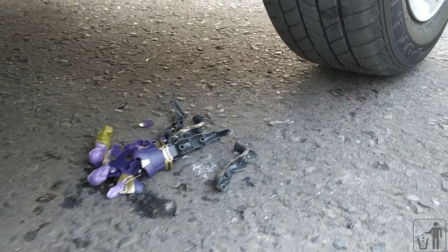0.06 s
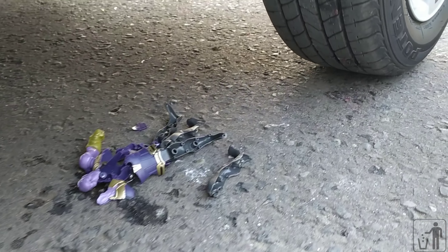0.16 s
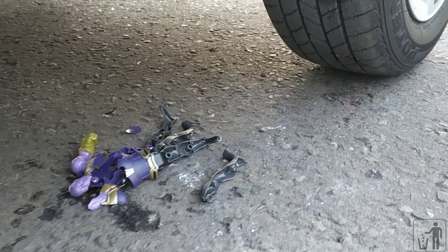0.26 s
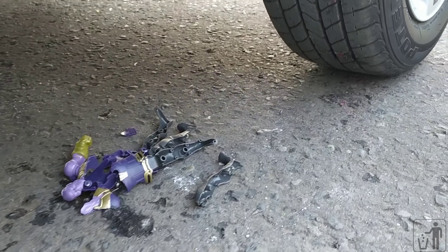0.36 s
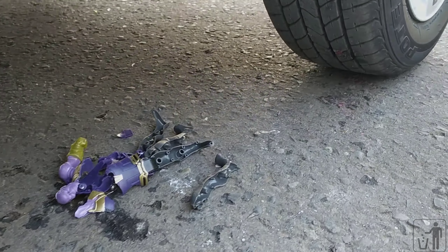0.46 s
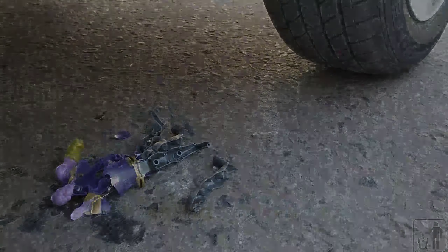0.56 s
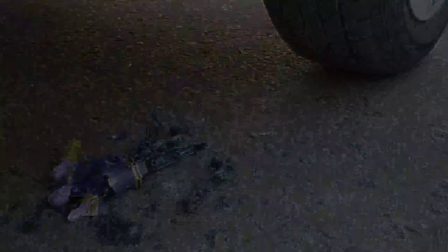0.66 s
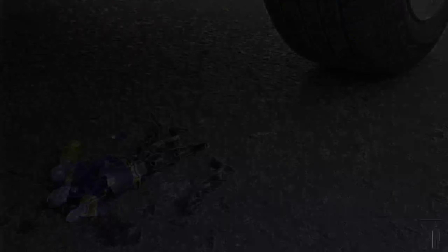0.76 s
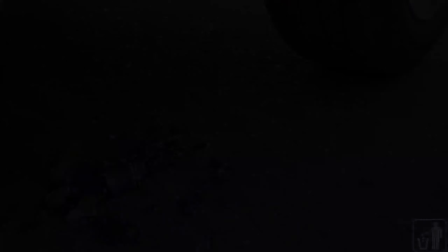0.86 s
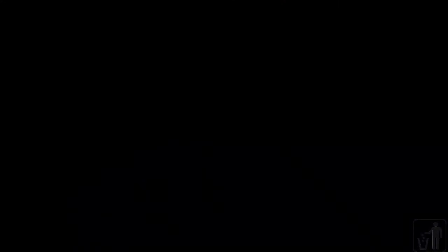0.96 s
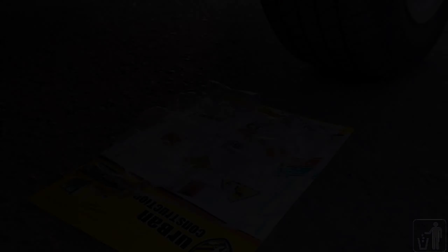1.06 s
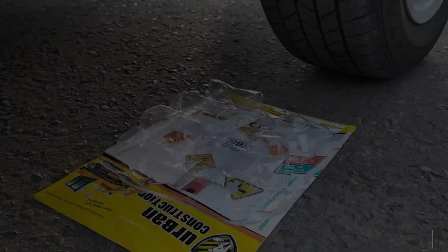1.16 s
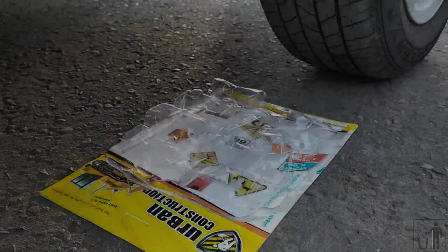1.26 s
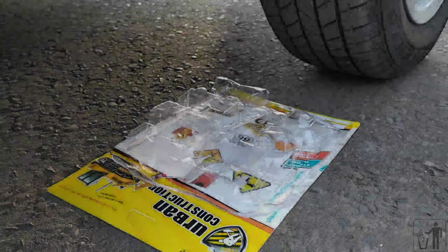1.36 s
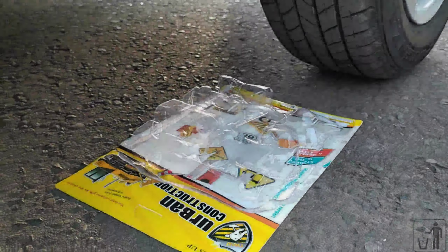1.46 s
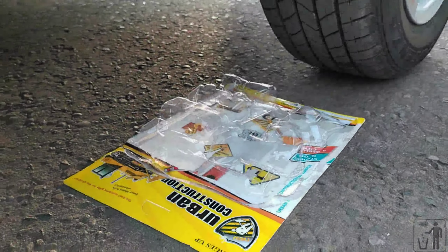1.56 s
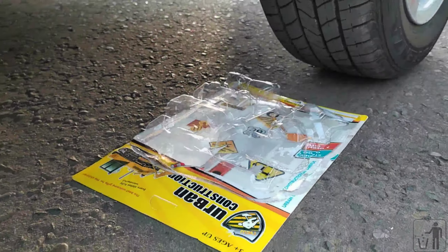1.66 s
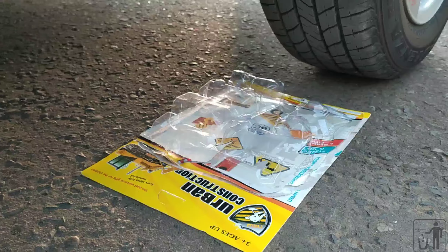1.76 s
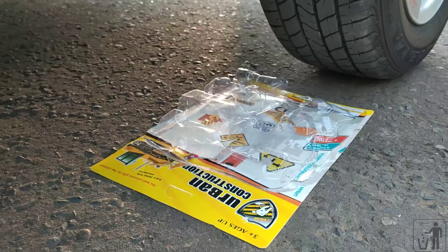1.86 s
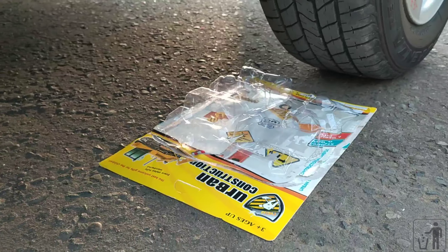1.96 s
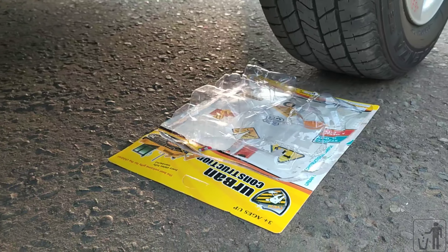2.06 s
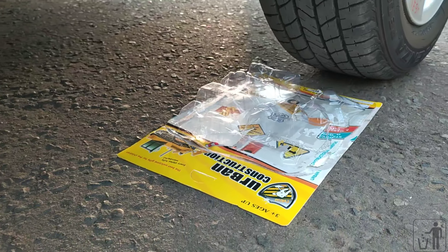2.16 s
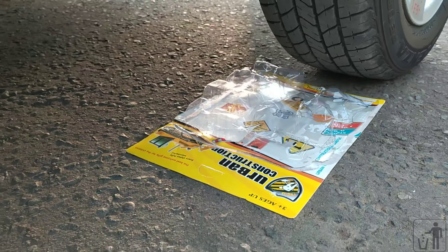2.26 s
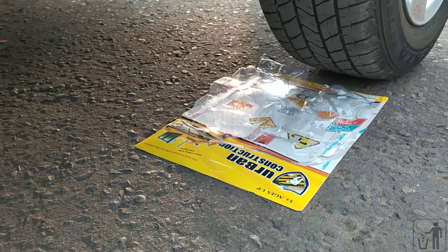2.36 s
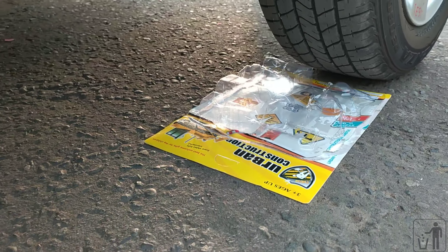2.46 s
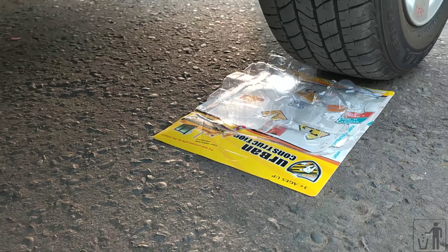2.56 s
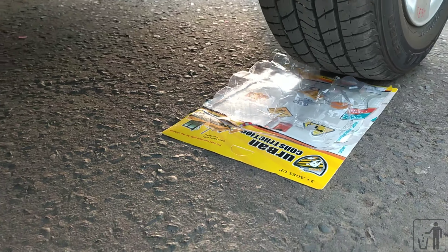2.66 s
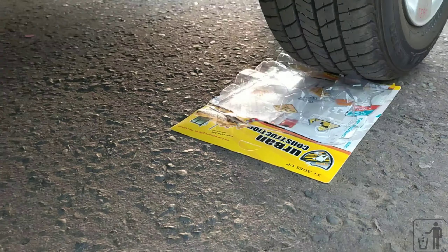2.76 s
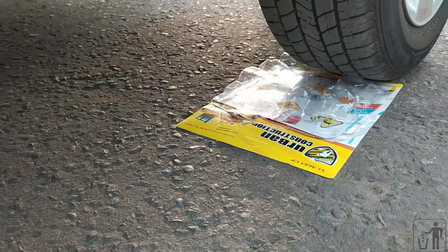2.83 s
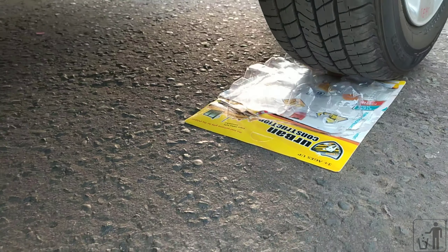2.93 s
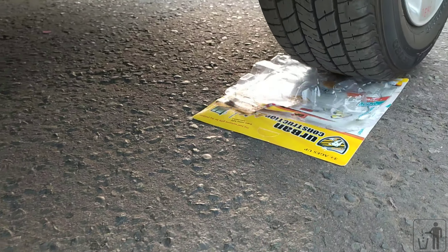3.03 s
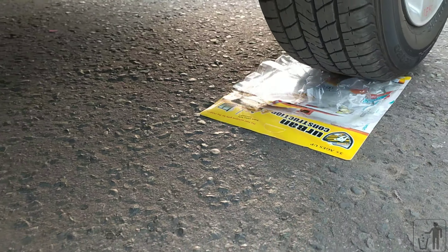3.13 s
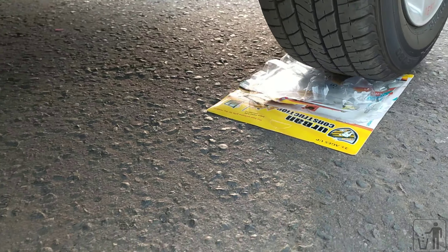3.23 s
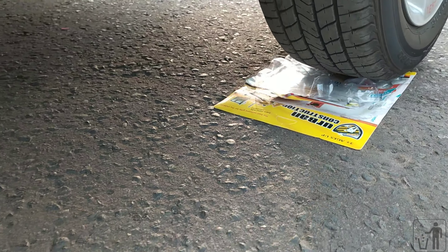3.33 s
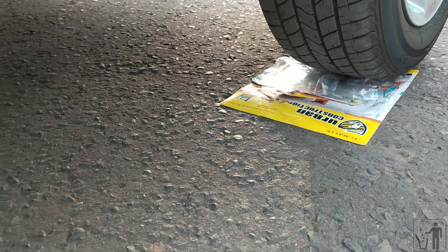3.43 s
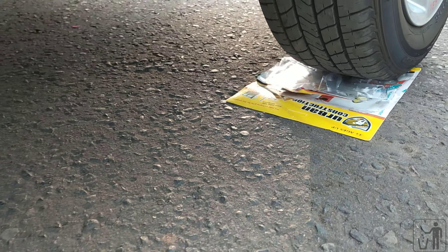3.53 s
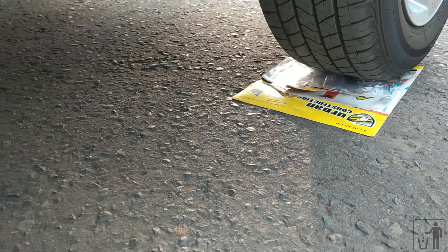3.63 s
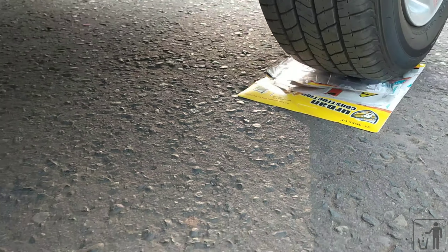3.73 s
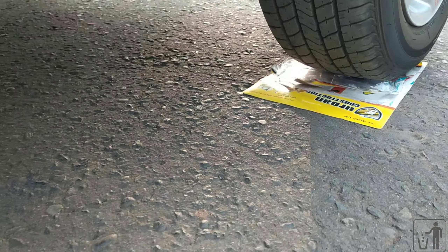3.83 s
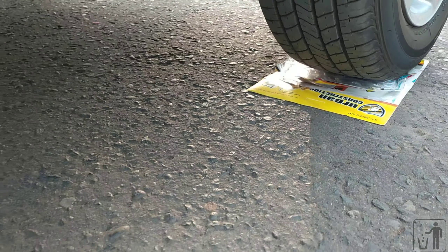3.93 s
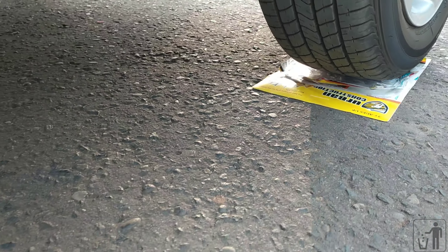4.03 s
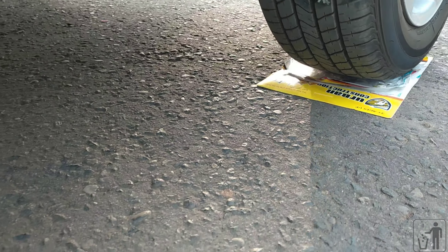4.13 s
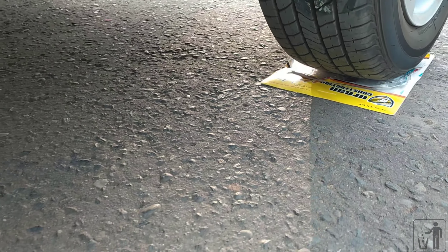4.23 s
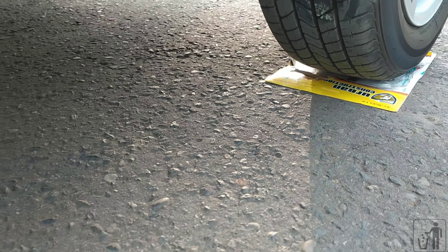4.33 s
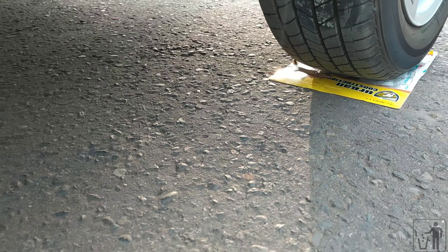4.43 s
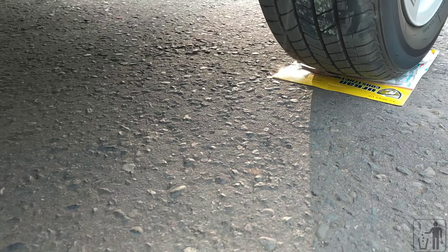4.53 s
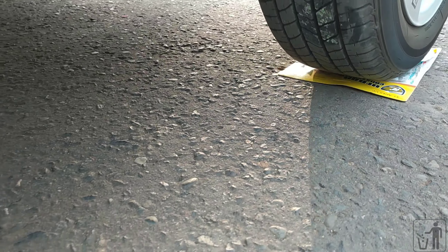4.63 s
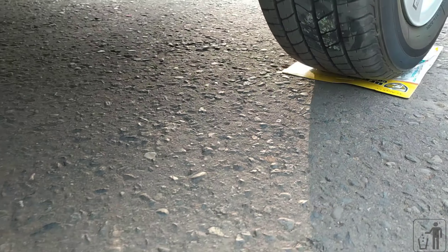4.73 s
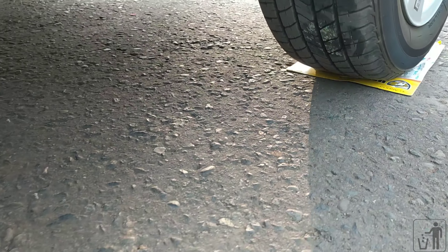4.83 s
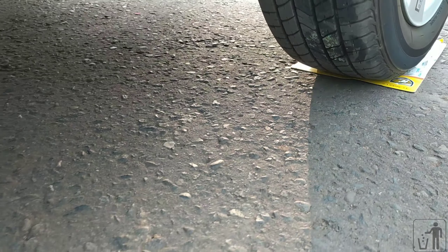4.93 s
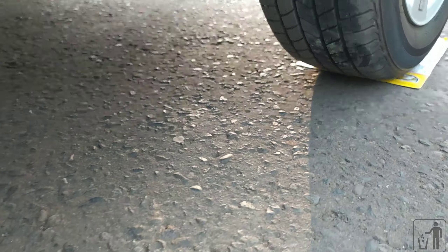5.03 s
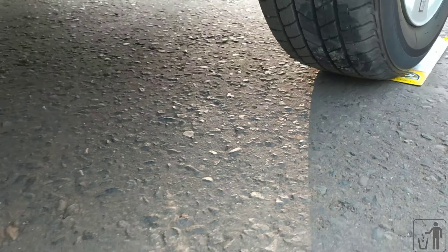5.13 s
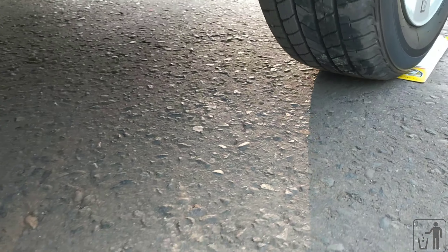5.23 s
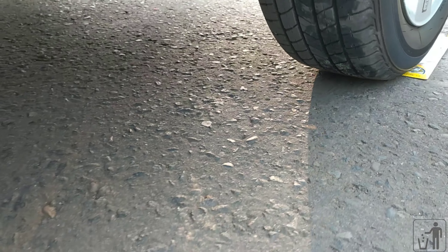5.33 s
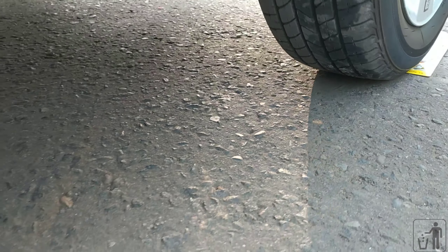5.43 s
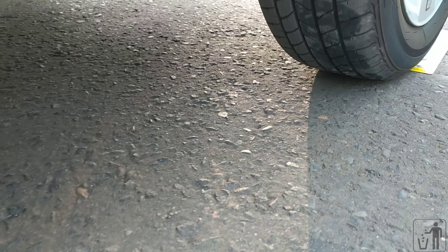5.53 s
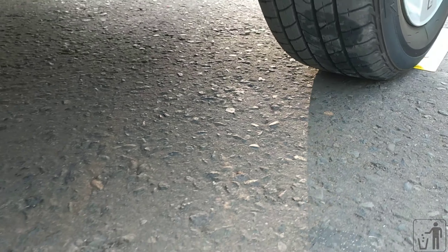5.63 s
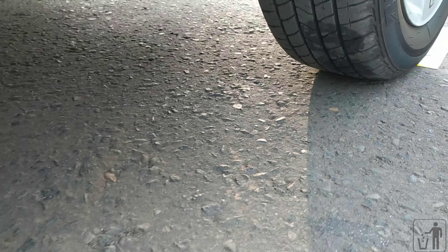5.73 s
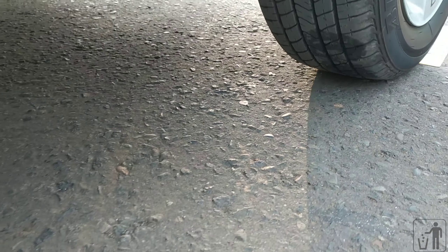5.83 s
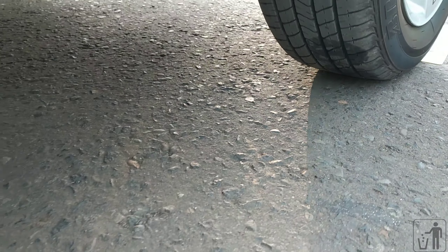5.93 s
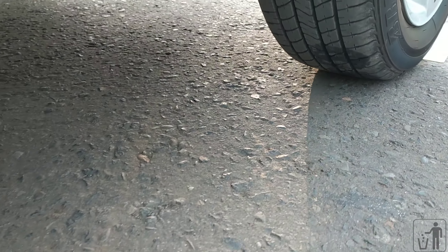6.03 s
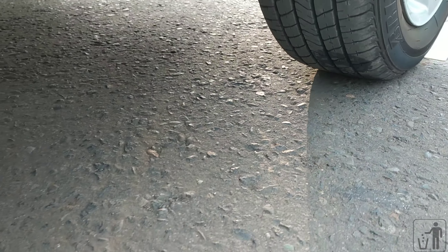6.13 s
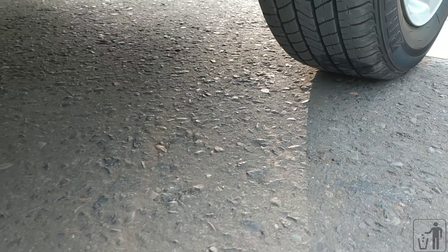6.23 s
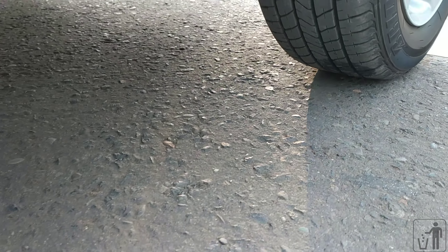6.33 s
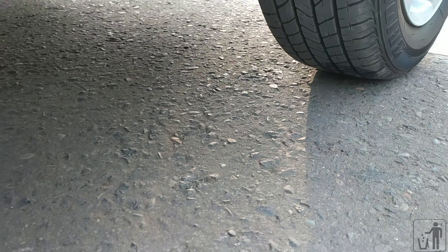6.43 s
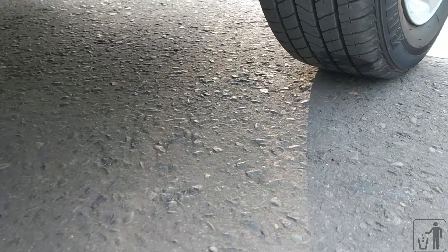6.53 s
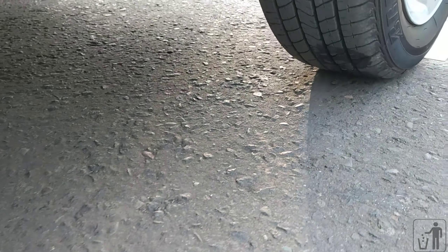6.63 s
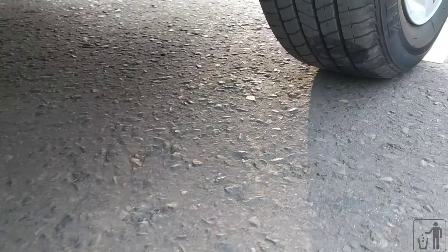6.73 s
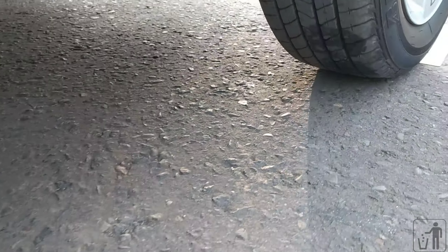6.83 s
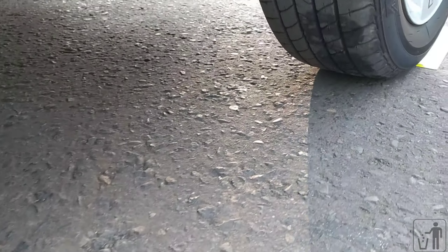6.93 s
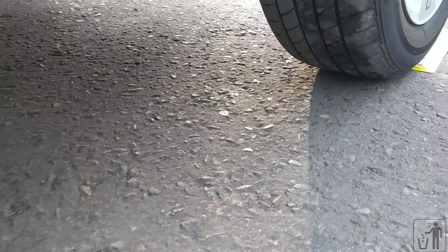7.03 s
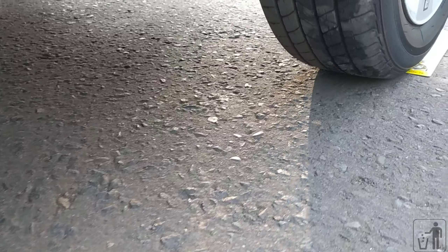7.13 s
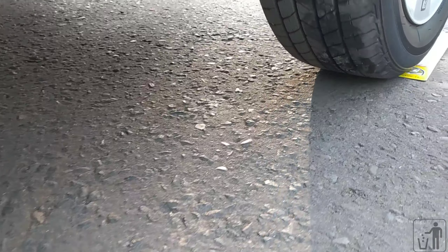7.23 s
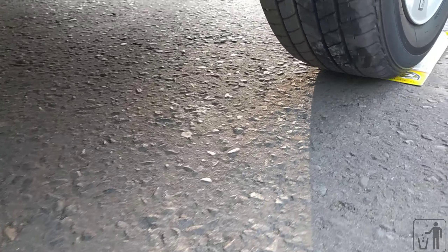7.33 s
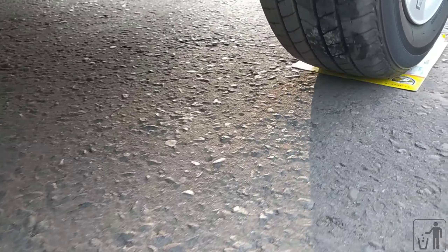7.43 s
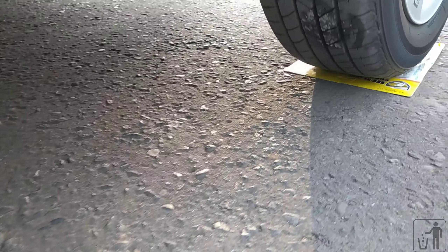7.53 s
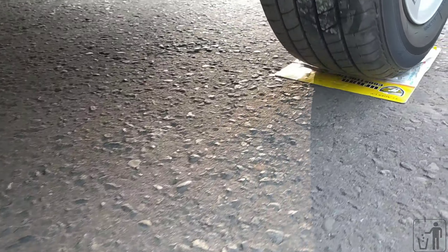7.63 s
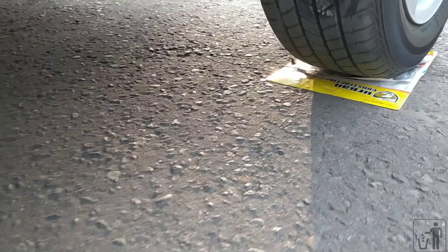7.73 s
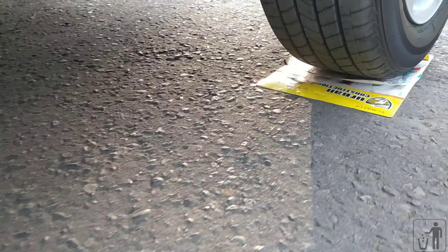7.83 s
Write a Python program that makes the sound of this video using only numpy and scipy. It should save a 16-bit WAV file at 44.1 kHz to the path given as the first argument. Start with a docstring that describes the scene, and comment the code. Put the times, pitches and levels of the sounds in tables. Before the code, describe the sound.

Low idling engine throb, brief wind puffs and plastic clacks, then dense sharp cracking of blister packaging under a slow tyre, thinning out and resuming.

```python
"""On asphalt, a car creeps at idle over a plastic toy pack, rolls off it and comes back.
The stiff blister buckles in sharp snaps and fine crinkles: short filtered noise bursts with a damped ring.
Dense reflections between road and underbody answer them, strongly where the tyre covers the pack.
Shaped noise and sines at firing orders make the car; low noise makes the wind.
Near the start come puffs of wind, two clacks of loose plastic and a short fade to silence."""
import sys
import numpy as np
from scipy import signal
from scipy.fft import rfft, irfft
from scipy.io import wavfile
from scipy.ndimage import uniform_filter1d

SR = 44100
rng = np.random.default_rng(int(sys.argv[2]) if len(sys.argv) > 2 else 0)


def wrap_up_sound(samples):
    """Save the sound to the file named by the first command line argument, as 16-bit audio."""
    columns = np.atleast_2d(samples).T
    # keep every value between -1 and 1, then stretch to whole-number steps
    tamed = np.clip(columns, -1, 1)
    steps = np.round(tamed * 32767).astype(np.int16)
    wavfile.write(sys.argv[1], SR, steps)


N = 347949
TIME = np.arange(N) / SR


def amp(db):
    """Decibel law: level in dB to amplitude gain."""
    return 10 ** (np.asarray(db) / 20)


def unit(x):
    """Normalisation: scales to rms 1."""
    return x / np.sqrt(np.mean(x ** 2) + 1e-20)


def curve(rows, t=TIME, order=1):
    """Linear interpolation: one column of a table over time, held at both ends."""
    rows = np.array(rows)
    return np.interp(t, rows[:, 0], rows[:, order])


def colour(rows, hz, order=1):
    """Spectral envelope: one column of a table, joined by straight lines in log frequency."""
    rows = np.array(rows)
    return np.interp(np.log(hz + 1), np.log(rows[:, 0] + 1), rows[:, order])


def peaks(modes, hz):
    """Modal sum: power gain of a set of resonances."""
    total = 0
    for centre, width, db in modes:
        total = total + amp(db) ** 2 / (1 + (2 * (hz - centre) / width) ** 2) ** 2
    return total


def add(mix, s, sound):
    """Superposition: mixes a sound in at time s."""
    part = mix[max(round(s * SR), 0):][:len(sound)]
    part += sound[:len(part)]


def noise(spectrum, modes=()):
    """Filtered noise: random pressure of rms 1 with the given colour and resonances."""
    hz = np.fft.rfftfreq(N, 1 / SR)
    gain = amp(colour(spectrum, hz)) * np.sqrt(1 + peaks(modes, hz))
    return unit(irfft(rfft(rng.standard_normal(N)) * gain, N))


def drift(hz):
    """Low-passed chance: a random curve of rms 1 that varies up to about hz."""
    lowpass = np.exp(-(np.fft.rfftfreq(N, 1 / SR) / hz) ** 2)
    return unit(irfft(rfft(rng.standard_normal(N)) * lowpass, N))


# the background fades out, cuts to silence, returns faintly and fades in (s)
FADE_OUT_S, SILENT_FROM_S, SILENT_TO_S, RISE_FROM_S, FADED_IN_S = 0.48, 1.088, 1.112, 1.22, 1.755
# gain just before and just after the silence (0-1)
CUT_GAIN, FAINT_GAIN = 0.026, 0.02


def fades():
    """Gain envelopes: a straight fade out that ends in a cut, and a slow-starting fade in after it."""
    before = np.interp(TIME, [FADE_OUT_S, SILENT_FROM_S], [1, CUT_GAIN], right=0)
    after = np.interp(TIME, [SILENT_TO_S, RISE_FROM_S, FADED_IN_S], [FAINT_GAIN, 2 * FAINT_GAIN, 1], left=0)
    return before, after


# Puffs of wind on the microphone. Each row: centre in seconds, level in dB.
GUSTS = [(0.111, -37), (.42, -48), (.64, -39)]
# Turbulent push of the wind. Each row: frequency in Hz, relative density in dB per Hz.
BUFFET = [(5, 1), (14, 6.5), (26, -4.5), (50, -10.5), (90, -35), (200, -41), (600, -72)]
# Soft rush of air. Each row: frequency in Hz, relative density in dB per Hz.
RUSH = [(100, -10), (300, -20), (480, 12), (750, -4), (1150, 11), (1500, -16), (3400, -23), (5500, -25),
        (9000, -39)]
# half length of a puff (s); the breeze before and after the silence (dB)
GUST_S, BREEZE_DB, CALM_DB = 0.019, -45, -58


def wind(rush_db=-71):
    """Turbulence: low noise with soft puffs over a faint rush of air, almost calm after the silence."""
    before, after = fades()
    puffs = sum(amp(db) * np.exp(-((TIME - s) / GUST_S) ** 2) for s, db in GUSTS)
    push = (before * (amp(BREEZE_DB) + puffs) + after * amp(CALM_DB)) * noise(BUFFET)
    rush = amp(rush_db + 2 * drift(25)) * before * noise(RUSH)
    return push + rush


# Idling engine. Each row: time in seconds, firing rate in Hz.
FIRING = [(1.5, 21.55), (2.3, 21.99), (2.8, 21.77), (3.7, 21.58), (4.25, 21.84), (5.2, 21.68), (6.2, 21.57),
          (6.75, 21.61), (7.4, 21.65)]
# Exhaust drone. Each row: multiple of the firing rate, rms level in dB relative to drone_db.
DRONE = [(1, -56), (2, -74.5), (3, -82), (4, -61.5), (5, -68.5), (7, -72), (8, -68.5), (9, -75.5),
         (10, -78.5)]
# Engine bay and street. Each row: frequency in Hz, relative density in dB per Hz.
WASH = [(60, -20), (250, -4.5), (450, -2.5), (560, -10.5), (1000, -16.5), (1450, -15.5), (2200, -18),
        (3200, -13.5), (4700, -21), (6300, -19), (7800, -25), (11000, -25), (16000, -28.5)]
# Resonances of the space under the car. Each row: centre in Hz, width in Hz, level in dB above the wash.
CAVITY = [(650, 19, 11.5), (803, 38, 12.5), (969, 134, 13.5), (1160, 31, 8.5), (2410, 180, 3.5),
          (2660, 160, 2.5), (3500, 120, 2.5), (5630, 2700, 2), (9800, 550, 2)]
# Rubber rolling on grit. Each row: frequency in Hz, relative density in dB per Hz.
ROLL = [(40, -34), (110, -15), (170, 10.5), (260, -4), (340, 1.5), (520, -16.5), (900, -45), (3000, -37)]
# Pushes and pauses of the tyre. Each row: time in seconds, rolling level in dB relative to roll_db.
ROLLING = [(.9, -63.5), (2, -65), (2.28, -58.5), (2.34, -52.5), (2.41, -58), (2.6, -60), (4.3, -55.5),
           (5.75, -57.5), (6.3, -60.5), (7.1, -57), (7.89, -61)]


def car(wash_db=-61, roll_db=-3.5, drone_db=-2, waver=0.25, throb_db=1.03, flutter_db=1.58):
    """Harmonic series and modulated noise: exhaust orders, hiss pulsing with each firing, low tyre roll."""
    turns = np.cumsum(curve(FIRING)) / SR  # firings so far
    drone = 0
    for k, db in DRONE:
        swell = amp(db) * np.sqrt(2) * (1 + waver * drift(4.9))
        drone = drone + swell * np.sin(2 * np.pi * (k * turns + rng.random()))
    pulsing_db = throb_db * np.cos(2 * np.pi * turns) + flutter_db * drift(96)
    wash = amp(wash_db + pulsing_db) * noise(WASH, CAVITY)
    roll = amp(roll_db + curve(ROLLING) + 2.9 * drift(22)) * noise(ROLL)
    return sum(fades()) * (amp(drone_db) * drone + wash + roll)


# Loose plastic clacking. Each row: start in seconds, level in dB before onset and decay, decay in seconds,
# upper middle in dB, treble in dB, share of the bright piece from 0 to 1.
CLACKS = [(.749, -54, 0.023, -12, -20, .3), (.766, -43.5, 0.02, -1, -0.5, 0),
          (0.892, -56, 0.022, 2, -7, 0.5), (0.9296, -43, 0.011, -2, 11.5, 0.95),
          (0.937, -50, 0.011, 9, -2, 1)]
# Modes the bright piece rings with. Each row: centre in Hz, width in Hz, level in dB.
BRIGHT_PIECE = [(480, 320, 1.5), (1080, 310, 0.5), (2800, 1200, -8), (3800, 1100, -12), (7200, 890, -8),
                (9700, 900, -17), (10600, 700, -21), (12000, 800, -22), (14900, 1000, -28)]
# A second, duller piece, hardly ringing. Each row: frequency in Hz, level in dB.
DULL_PIECE = [(100, -13), (520, 5.5), (1000, -5), (1500, -12), (3600, -10), (6000, -20), (9000, -20),
              (14000, -40)]


def clacks(size=5000):
    """Repeated impact: two loose pieces of plastic chatter on the road, one dull, one bright."""
    hz, t = np.fft.rfftfreq(size, 1 / SR), np.arange(size) / SR
    out = np.zeros(N)
    for s, db, decay_s, middle_db, treble_db, bright in CLACKS:
        body = np.sqrt(bright * peaks(BRIGHT_PIECE, hz) + (1 - bright) * amp(colour(DULL_PIECE, hz)) ** 2)
        gain = body * amp(colour([(1000, 0), (2500, middle_db), (7000, treble_db)], hz))
        contacts = .35 + np.exp(-3 * (t * rng.uniform(220, 340) % 1))  # contacts per second
        chatter = unit(irfft(rfft(contacts * rng.standard_normal(size)) * gain, size))
        onset = 1 - np.exp(-t / 0.00064)
        add(out, s, amp(db) * chatter * np.exp(-t / decay_s) * onset)
    return out


# Modes of a bit of grit. Each row: frequency in Hz, starting level in dB, decay in seconds.
PING = [(2200, -40.5, 0.0042), (2430, -48, .007), (3750, -57, .003)]
PING_S = 6.7576  # start (s)


def ping():
    """Free vibration: a bit of grit springs from under the tread with a short, clear note."""
    t = np.maximum(TIME - PING_S, 0)
    return sum(amp(db) * np.exp(-t / decay_s) * np.sin(2 * np.pi * hz * t) for hz, db, decay_s in PING)


# Centres of the knock, middle, crack and fizz bands in Hz.
BANDS_HZ = [620, 1750, 4600, 10000]
# Reference colour that folds are drawn towards: knock, crack and fizz in dB against the middle band.
REFERENCE_DB = [-32, -6, -17.5]
# Colour common to all folds of the shell. Each row: frequency in Hz, level in dB.
SHELL = [(40, -29), (200, -15.5), (400, -7.5), (900, 1), (1300, -0.5), (2200, 0.5), (3400, 1.5),
         (4200, 1.5), (6000, 5), (7100, 0), (10000, 4.5), (14000, -3), (16500, -14)]
# half width of a ring, which the tread damps within a cycle or two (share of its pitch, Hz on top)
RING_SHARE, RING_HZ = 0.08, 110
PATCH_DB = 3.2  # how far the lesser modes of each patch of plastic stand out (dB)


def snap(ring_hz, knock_db, crack_db, fizz_db, ring_db, tear_s, edge_share=.45, size=1024):
    """Buckling: a run of tiny jolts rings a patch of plastic for a few cycles, with energy 1."""
    hz, t = np.fft.rfftfreq(size, 1 / SR), np.arange(size) / SR
    bands_db = colour(list(zip(BANDS_HZ, [knock_db, 0, crack_db, fizz_db])), hz)
    # each patch has its own lesser modes
    patch_db = PATCH_DB * unit(uniform_filter1d(rng.standard_normal(len(hz)), size=14))
    # a dull pop has a steep upper edge
    top_hz = np.clip(2 * ring_hz, 3000, 6000)
    dullness_db = np.clip(REFERENCE_DB[2] - fizz_db, 0, 15)
    edge_db = edge_share * dullness_db * np.clip(4 * np.log2((hz + 1) / top_hz), 0, 1)
    ring = 1 + amp(ring_db) ** 2 / (1 + ((hz - ring_hz) / (RING_SHARE * ring_hz + RING_HZ)) ** 2)
    log_gain = np.log(amp(bands_db - edge_db + patch_db + colour(SHELL, hz)) * np.sqrt(ring))
    # minimum phase: the patch rings only after the jolt
    mirrored = np.r_[log_gain, log_gain[-2:0:-1]]
    response = np.exp(np.conj(signal.hilbert(mirrored)))[:len(hz)]
    # a fold with little fizz tears faster
    tear_s = tear_s * rng.uniform(.7, 1.3) * np.interp(fizz_db, [-35, -18], [.6, 1])
    force = rfft(rng.standard_normal(size) * t * np.exp(-t / tear_s))
    # even out the spectrum: the tear is spread in time but broadband
    force = force / np.sqrt(uniform_filter1d(abs(force) ** 2, 20) + 1e-30)
    return unit(irfft(force * response)[:size // 2]) / np.sqrt(size // 2)


# Fine crinkling under the tread as it rolls over the pack and comes back.
# Each row: time in seconds, level in dB.
CRINKLE = [(2.6, -60), (2.88, -56), (3.04, -44), (3.15, -41), (3.32, -34.5), (3.39, -41), (3.64, -32.5),
           (3.75, -34.5), (3.87, -33.5), (3.95, -44), (4.17, -38.5), (4.7, -44.5), (4.95, -48),
           (5.6, -50.5), (5.87, -67.5), (7.18, -56.5), (7.3, -49), (7.5, -43), (7.89, -40.5)]
# How far the tyre hides the pack. Each row: time in seconds, echo level in dB relative to echo_db,
# brightness of the crinkles in dB.
COVER = [(2.7, -5.5, -34), (3.1, -7, -7), (3.7, -3.5, 1.5), (4.3, -10, 9), (4.8, -5, 1), (5.3, -2.5, 4),
         (5.8, 1.5, 2), (6.75, 5, -4), (7.3, -2, 3), (7.55, -1, 4), (7.89, -6.5, 22.5)]
# small folds: mean pops per second before clumping, spread of sizes (dB) and of clumping (dB)
FOLDS_PER_S, FOLD_SPREAD_DB, CLUMP_DB = 300, 5.0, 4.0
# base time scale of a tear (s)
TEAR_S = 0.00032


def crinkle(pitch_hz=2000, ring_db=12, knock_db=-9, crack_db=-8, fizz_db=-15.5, count=60):
    """Random point process: many small folds pop in clumps as the tread presses the pack flat."""
    pressure = np.maximum(amp(curve(CRINKLE)) - amp(-60.5), 0)  # a light touch folds nothing
    met = TIME > CRINKLE[0][0]  # none before the tyre meets the pack
    chance = FOLDS_PER_S / count / SR * amp(CLUMP_DB * drift(70)) * met
    out = np.zeros(N)
    for _ in range(count):
        pitch, knock, crack, fizz = rng.standard_normal(4)
        bands_db = [knock_db + 4 * knock, crack_db + 4 * crack, fizz_db + 4 * crack + 4 * fizz]
        fold = snap(pitch_hz * np.exp(.5 * pitch), *bands_db, ring_db, TEAR_S / 2)
        at = np.flatnonzero(rng.random(N) < chance)
        sizes = amp(FOLD_SPREAD_DB * (np.minimum(rng.exponential(1, len(at)), 3) - 3.0))
        for i, strength in zip(at, sizes * pressure[at]):
            add(out, i / SR, strength * fold)
    # tilt the spectrum about 2500 Hz
    dull = signal.sosfilt(signal.butter(1, 2500, fs=SR, output="sos"), out)
    tilt = amp(curve(COVER, order=2) / 2)
    return np.sqrt(SR / FOLDS_PER_S) * (dull / tilt + (out - dull) * tilt)


def lesser_snaps(per_s=34, above_db=-3.0, spread_db=3.0, pitch_hz=2100, octaves_per_db=0.5,
                 scatter_octaves=0.56, knock_db=-8, bright_db=-8.0, bright_per_db=0.94,
                 scatter_db=3.5, count=200):
    """Jittered timing: rows of weaker snaps, louder under pressure, higher and brighter on a flatter pack."""
    s = CRINKLE[0][0] + (np.arange(count) + rng.random(count)) / per_s
    level, pitch, knock, bright = np.clip(rng.standard_normal((count, 4)), -2, 2).T
    pressed_db, flat_db = curve(CRINKLE, s), curve(COVER, s, order=2)
    db = pressed_db + above_db + spread_db * level
    ring_hz = pitch_hz * 2 ** (octaves_per_db * flat_db + scatter_octaves * pitch)
    knocks_db = knock_db + scatter_db * knock
    brights_db = bright_db + bright_per_db * flat_db + scatter_db * bright
    rows = np.c_[s, db, ring_hz, knocks_db, brights_db, curve(COVER, s)]
    return rows[(s < TIME[-1]) & (pressed_db > -57)]


# dB of crack and of fizz for each dB of brightness
CRACK_SLOPE, FIZZ_SLOPE = 0.54, 1.29
# doublings of the tear for each dB of echo: deep under the tread a fold gives way slowly
TEAR_OCTAVES_PER_DB = 0.08


def strikes(rows, ring_db, contrast, before_db=-17, after_db=-15, span_s=0.004):
    """Stick and slip: each fold ticks just before it gives way and slips once more after."""
    out = np.zeros(N)
    for (s, db, ring_hz, knock_db, bright_db, deep_db), chance in zip(rows, rng.random((len(rows), 6))):
        crack_db = REFERENCE_DB[1] + CRACK_SLOPE * bright_db
        fizz_db = REFERENCE_DB[2] + FIZZ_SLOPE * bright_db
        bands_db = np.array([knock_db, crack_db, fizz_db])
        # contrast below 1 leans towards the reference colour, with weak knock
        bands_db = np.array(REFERENCE_DB) + contrast * (bands_db - REFERENCE_DB)
        # a fold that pops without tearing rings more purely
        ping_db = ring_db + 0.24 * (REFERENCE_DB[2] - bands_db[2])
        tear_s = TEAR_S * 2 ** (TEAR_OCTAVES_PER_DB * deep_db)
        strength = amp(db) * np.sqrt(span_s * SR)  # the level is the rms over span_s
        add(out, s, strength * snap(ring_hz, *bands_db, ping_db, tear_s))
        for way, slip_db, (lag, shift, size) in zip([-1, 1], [before_db, after_db], chance.reshape(2, -1)):
            slip_s = way * (.001 + .004 * lag)
            # dull pops at the open edge are nearly single and clean
            slip = amp(slip_db + 0.5 * min(bright_db, 0) + 0.37 * deep_db) * 2 * size ** 2
            slip_hz = ring_hz * 2 ** (shift - .5)
            add(out, s + slip_s, strength * slip * snap(slip_hz, *bands_db, ping_db, TEAR_S / 2))
    return out


def hidden(rows, deepest_knock_db=0):
    """Directivity: deep snaps echo most, open-edge ones stay dry, and rubber soaks up hard knocks."""
    return [(s, db + echo_db, hz, min(knock_db, deepest_knock_db), bright_db, echo_db)
            for s, db, hz, knock_db, bright_db, echo_db in rows]


# Echo between road and underbody. Each row: frequency in Hz, 60 dB decay time in seconds, level in dB.
UNDERBODY = [(200, 0.31, 2), (616, 0.15, 7.5), (1570, 0.1, 1), (2800, 0.1, 4.5), (5700, 0.12, 2.5),
             (14300, 0.064, 5)]


def underbody(x, early_db=5, early_s=0.0077, onset_s=0.0027, size=12000):
    """Reverberation: dense reflections off road, tyre and floor pan, strong at first, then a short tail."""
    t = np.arange(size) / SR
    taps = rng.standard_normal(size) * (rng.random(size) < .25)
    taps = taps * np.minimum(t / onset_s, 1) ** 2 * (1 + amp(early_db) * np.exp(-t / early_s))
    hz, when, z = signal.stft(taps, SR, nperseg=128)
    decay = np.exp(-np.log(1000) * when / colour(UNDERBODY, hz)[:, None])
    z = z * decay * amp(colour(UNDERBODY, hz, order=2))[:, None]
    tail = signal.istft(z, SR, nperseg=128)[1]
    return signal.oaconvolve(x, tail / np.linalg.norm(tail))[:N]


def echoes(x, count=4):
    """Multipath: folds break at different places, so several echo paths take turns, 31 slices a second."""
    place = ((TIME * 31) % count).astype(int)
    return sum(underbody(x * (place == k)) for k in range(count))


# Colour of the flat pack when the tyre comes back. Each row: frequency in Hz, gain in dB.
FLATTENED = [(700, -1.5), (1400, 1.5), (2100, -1.5), (3000, 0.5), (3800, 2.5), (4900, -1), (6000, 0.5),
             (9000, 0)]
RETURN_S = 6.5  # the flat colour applies from here (s)


def flattened(x):
    """Linear filtering: on the way back the flat pack clicks in a narrower, harder band."""
    hz = np.fft.rfftfreq(N, 1 / SR)
    flat = irfft(rfft(x) * amp(colour(FLATTENED, hz)), N)
    return np.where(TIME < RETURN_S, x, flat)


# Loud snaps of the blister. Each row: time in seconds, level in dB, ring pitch in Hz,
# knock against the middle band in dB, brightness in dB, echo in dB.
SNAPS = [(2.7112, -31.5, 2250, 4, -7.5, -8), (2.7344, -36.5, 815, 3, -16, 0),
         (2.7541, -42, 845, 7, -20, -2), (2.7571, -39, 1950, 5, -12, -5), (2.8224, -47, 1500, -8, -10, -6),
         (2.8257, -43, 1780, 1, 0, -5), (2.8373, -39, 4500, 18, 19, -3), (2.8764, -39.5, 2240, -1, -17, -5),
         (2.8868, -34, 925, -13, -22, -4), (2.9096, -31, 2260, -2, -5, -2),
         (2.9308, -31.5, 1800, 11, -2, 5.5), (2.9425, -42, 760, 6, -14, -2),
         (2.9499, -40, 1460, 15, -20, -1), (2.9573, -42, 990, 13, -13, -11), (2.9728, -38.5, 1280, 4, 1, 5),
         (3, -27, 2330, -4, 0.5, -2), (3.0226, -30.5, 1070, 9, 17, 3), (3.0264, -24.0, 1870, -3, 0, 2),
         (3.0379, -27, 1790, 6.5, 1, 2.5), (3.0462, -19.5, 1370, -13, -3, 1.5),
         (3.0492, -25, 1500, -8, -3, -2), (3.0609, -39, 1460, -12, 4, -5), (3.0676, -24, 2060, -1, 7, -6),
         (3.081, -32, 1850, 7, 1, -4), (3.0929, -26.5, 680, 4.5, 2, 0), (3.101, -40, 2020, -7, -2, -5),
         (3.112, -31, 2924, 5, 2, 1), (3.1208, -25.5, 2740, -13, -4, 2.5), (3.1255, -33, 2070, -4, 0, -5),
         (3.1291, -26.5, 1550, 4, -3, -4), (3.1368, -30.5, 1890, 5, 10, 3), (3.1483, -34, 1940, 6, -4, -6),
         (3.1584, -28, 2200, -7, -2, -2), (3.166, -27.5, 2360, -12, -5, 5),
         (3.1706, -23.5, 4870, -23, -3, -3), (3.176, -29.5, 2845, -18, 3, -5),
         (3.201, -24, 1110, 4.5, 3.5, 1), (3.2165, -22.0, 1830, -8, 1.5, -1),
         (3.2208, -28.5, 3190, 8, 0, 0), (3.2419, -30, 1510, 2, 7, 2), (3.257, -32, 2070, -6, -13, -2),
         (3.2662, -27, 2200, 8, -13, 1), (3.2834, -23, 850, 4.5, 3.5, 1.5), (3.3016, -31, 2020, 2, 4, -10),
         (3.3048, -17, 2090, -5.5, 3, -3.5), (3.3306, -35, 2630, -4, -3, -6),
         (3.337, -22.5, 1600, -6, -5.5, -3), (3.3613, -33, 2410, -20, 7, 2),
         (3.367, -29.5, 2090, -14, -13, -10), (3.375, -34, 2930, -1, -6, -16),
         (3.4006, -32.5, 2200, -5, -8, -2), (3.4154, -30.0, 900, 9.5, -2, 0),
         (3.4209, -33.5, 650, 6, -3, -4), (3.4493, -38, 2330, -2, -12, -6), (3.4573, -35.5, 5300, -9, 6, 0),
         (3.4621, -30.5, 3200, -21.5, 5, 2.5), (3.4709, -36, 1460, -12, 6, -5),
         (3.4833, -35, 1890, -12, -1, -1), (3.5025, -22, 2050, -40, -16, -6),
         (3.5207, -26.5, 2490, -15, -5.5, -7), (3.5345, -34.5, 980, 4, -1, 8),
         (3.5602, -28, 650, 4, -15, -1.5), (3.5785, -30.5, 3160, 11, -3, 0), (3.586, -33, 1720, 0, 0, -3),
         (3.594, -40, 2540, 12, 5, -5), (3.6032, -28.5, 2326, 15.5, -3, 0), (3.6091, -22, 2510, 2, 2, -2),
         (3.6211, -36, 3960, -4, -1, -4), (3.6328, -24, 2670, 2, 4, -10), (3.6425, -18, 2550, 10, 5, -2.5),
         (3.6645, -37, 1710, -9, 6, -8), (3.6787, -32.5, 2070, 4, 2, 6), (3.7372, -25.5, 1970, -2, 1, -8),
         (3.7729, -27.5, 1020, 6.5, 4.5, -2), (3.7868, -28.5, 6000, -10, 6, -13),
         (3.7975, -26, 5600, -5, 3, -4), (3.8096, -36, 3230, -6, 5, -5), (3.8146, -37, 5770, -3, 1, 0),
         (3.8275, -34, 1640, 3, 10, 2), (3.8408, -25.5, 3480, -5, 3, 5.5), (3.8512, -26, 3060, 11, 13, -4),
         (3.867, -28, 4130, 13, 17, 2), (3.873, -26.5, 5600, 16, 9, -9), (3.8873, -27.5, 930, 2, 2, 1),
         (3.9135, -38, 4600, -8, 0, -6), (3.9169, -25, 1780, 2.5, 2, -5), (3.9321, -35, 1160, 7, 9, -5),
         (3.9369, -23.0, 1490, -1, 0, -5.5), (3.9782, -36.5, 1040, -4, 2, 3),
         (3.9887, -36.0, 5660, -2, 14, -5), (3.997, -23, 2230, -2.5, -1, 1),
         (4.0016, -27.5, 2170, -5, 7, -2), (4.0053, -30, 5380, -10, 0, -3),
         (4.0172, -28.5, 2140, -8, 6, -7), (4.0295, -34, 1080, -2, -2, -4), (4.0438, -32, 1670, 2, 1, -3),
         (4.0529, -30.5, 2110, -13, 1, -5), (4.0587, -24, 1265, -3.5, -1.5, -2),
         (4.0877, -27.5, 6200, 3.5, 9.5, -2), (4.106, -42, 3530, -8, 5, -3), (4.13, -33, 1676, -12, -13, 6),
         (4.1704, -34, 3600, 8, 15.5, 1), (4.1928, -32.5, 2270, 2, 0, -3), (4.2085, -37, 1130, 7, -13, -6),
         (4.2297, -33.5, 1495, -1.5, -15.5, 4), (4.246, -31, 1150, 5, 1, 3), (4.2516, -36, 1120, -6, 6, -7),
         (4.2605, -24, 1550, -7, -1.5, -1), (4.274, -31.5, 1030, -1, 12, -8),
         (4.288, -37, 2330, -20, -9, -8), (4.3193, -30, 1060, -7, -7, -1), (4.351, -25, 2690, -7, -7, -2),
         (4.365, -29, 1810, 4, 7, 3.5), (4.3835, -34.5, 2690, -2, -6, -4),
         (4.4093, -37.5, 1340, -3.5, 0.5, -4), (4.4173, -31.5, 1710, 1, -4, 1),
         (4.4288, -32, 1010, -8, 1, 0), (4.4435, -37, 2020, -3, 4, -4), (4.4555, -38.5, 6000, -13, 3, 0),
         (4.4689, -45, 1420, -3, -1, -5), (4.4784, -35, 3065, -19, -5, -9), (4.499, -44, 1890, -5, 5, -1),
         (4.5127, -33.5, 2100, -2, 3.5, 5), (4.5253, -42.5, 3750, -13, -3, -6),
         (4.55, -46, 5080, -6, 19, 0), (4.5639, -42, 1345, -10, -7.5, -6), (4.5695, -45, 2240, -3, 2, -5),
         (4.5797, -45, 1940, -14, 1, -5), (4.59, -35.5, 2230, -2, -2, -11),
         (4.6053, -36.5, 1680, -5, 6, -3), (4.6095, -34, 2260, -33, 2, -10),
         (4.6232, -38.5, 2840, -21, -10, -5), (4.6288, -41, 3610, -15, -3, -7),
         (4.634, -24, 3060, -14, 2.5, -10), (4.644, -33, 2800, -17, -2, -9),
         (4.6702, -41, 2600, -10, 5, -2), (4.6735, -34.5, 1420, -4, -8, -2),
         (4.6805, -33.5, 2300, -7, 5, 6), (4.6952, -41, 2410, -8, 5, -4), (4.7, -30.5, 3490, -13, 4, 1),
         (4.7291, -38, 2200, -13, 3, -1), (4.7376, -41, 5500, -12, 6, -3),
         (4.7397, -28.5, 4110, -20, -1, -7), (4.7475, -35.5, 2620, -29, 1, -3),
         (4.7544, -37, 1800, -16, 6, 6), (4.8034, -39, 3400, -9, 1, 4), (4.8354, -40.5, 1720, -7, 4, -1),
         (4.8429, -51, 5150, -6, 8, -7), (4.8649, -39, 2090, -4, -4, 7),
         (4.8779, -33.5, 5940, -16, -0.5, -4), (4.8879, -35.5, 3290, -27, 8, 0.5),
         (4.9611, -50, 4740, -5, 8, -1), (4.9745, -37, 3130, -15, -8, -7), (5.0267, -43.5, 5940, -1, 21, 1),
         (5.0362, -39.0, 1900, -6.5, -1.5, 1), (5.0744, -41.5, 2000, -9, 5, 9),
         (5.089, -43, 3620, -7, 4, -4), (5.0974, -36, 2950, -5, -2.5, 3), (5.1447, -45.5, 2370, -16, 6, 1),
         (5.1676, -44, 3190, -10, -4, 3), (5.2036, -41, 3750, -2, 2, -1), (5.2214, -45, 2070, -15, -3, -5),
         (5.2292, -34.5, 3480, -37, 2.5, -4), (5.2756, -47, 3270, -10, 6, -3),
         (5.283, -39, 3400, -11, 5, 6), (5.3002, -30, 3700, -36, -6, -4), (5.3209, -36, 2630, -20, -4, -6),
         (5.3248, -44, 3220, -8, 2, -5), (5.337, -45, 2150, -21, -10, -7), (5.352, -40, 2110, -16, -5, -2),
         (5.364, -34, 2980, -9, 0, -1.5), (5.3846, -40, 2750, -16, -7, 0), (5.4255, -48, 3880, -4, 3, -6),
         (5.4472, -32.5, 3220, 4, 6, -0.5), (5.4712, -44, 2530, -14, -7, -5),
         (5.478, -42.5, 2200, -23, 4, 1), (5.5206, -42, 3430, -18, 0, -4),
         (5.534, -41.5, 1460, -10.5, -12.5, -9), (5.5846, -40.5, 2890, -11, -5, -5),
         (5.6073, -38, 1620, -11, 2, 0.5), (5.6193, -37, 3025, -7.5, 5.5, 2.5),
         (5.7192, -42.5, 2090, -18, 2.5, -1), (5.8044, -41.5, 5600, 3, 4, 2.5),
         (5.8785, -53, 2300, -8, -6, -2), (6.1014, -52.5, 3340, 7, 3, 1.5),
         (6.156, -50, 3978, -4.5, 6, 0.5), (7.1416, -48.5, 2172, -12, -2, 0.5),
         (7.2042, -42, 1400, -10, -8, -8), (7.2058, -36, 2400, -4, -2.5, -2),
         (7.2259, -38, 1040, -4, -9, -3), (7.2399, -41, 1894, -14, -1, -7), (7.2777, -47, 4870, -7, 14, 3),
         (7.2878, -37.0, 2175, -11.5, -5, 2), (7.3048, -35, 2423, -11, -8, -11),
         (7.3128, -32.5, 1740, -20, -1, -4), (7.3278, -46, 1500, -7, -3, -8),
         (7.3358, -32.5, 3190, -17, -18, -5), (7.3396, -32.5, 2700, -30, -15, -11),
         (7.3504, -36, 3020, -22, -3, -4), (7.362, -44, 3320, -14, -1, -1),
         (7.3824, -39, 1890, -12, -11, -7), (7.3906, -45, 2070, -12, -6, -7),
         (7.3977, -47, 3620, -5, 3, -8), (7.4026, -34.5, 3370, -21, -23, -11),
         (7.4224, -40, 4440, -16, -14, -2), (7.4479, -32, 3040, -1, -2, -1),
         (7.4557, -34, 3140, -12.5, -6, 4.5), (7.4753, -45, 2360, -10, -2, -6),
         (7.4835, -41, 1100, -8, -14, -6), (7.486, -38, 2930, -1, -4, -1), (7.4906, -29, 3220, -5, 1, -2),
         (7.5063, -31, 2420, -7, -2, 1), (7.516, -28.5, 3700, -21, -14, -10),
         (7.535, -22.5, 3700, -8, -2, -1), (7.5648, -40.5, 3660, -12, -7, -5),
         (7.5838, -40, 1870, -5, -4, 3), (7.599, -46.5, 2630, -3, 0, -4),
         (7.6281, -37, 2990, -24.5, -4, -9), (7.6352, -46, 4090, -5, 4, -9),
         (7.6502, -47, 2200, -13, -1, -6), (7.6546, -37, 2880, -22, 1, -4), (7.6836, -41, 2500, -11, 8, -3),
         (7.7068, -45, 4890, -5, 11, -5), (7.721, -47, 1340, -8, 0, -3), (7.7382, -38, 2630, -5, -10, 2),
         (7.7515, -40, 1600, -9, -4, -5), (7.7572, -27.5, 2750, -18, 2.5, -5),
         (7.7774, -45, 3620, -2.5, 10, -5), (7.7901, -36, 2240, -13, -9, -8),
         (7.7936, -30.5, 2290, -11, -5, -7), (7.8157, -27.5, 3030, -14, 6, -6),
         (7.8364, -39, 6000, -16, 15, -1), (7.8466, -41, 4900, -8, 6, -6),
         (7.8592, -35.0, 2450, -16, 12, 3), (7.8787, -36.5, 1065, -6, -6, -4),
         (7.8864, -38, 2840, -15, -7, -6)]


def scene(echo_db=-2.5, crinkle_echo_db=-4.0, lesser_echo_db=-7):
    """Superposition of direct and reflected sound: the pack and its echo, grit, clacks, car and wind."""
    folds = crinkle()
    lesser = strikes(lesser_snaps(), ring_db=12.5, contrast=1.0)
    straight = strikes(SNAPS, ring_db=8.5, contrast=0.93) + folds + lesser
    # the echo gathers sound sent in every direction, so its ring stands out less
    thrown = strikes(hidden(SNAPS), ring_db=3.5, contrast=0.95)
    scattered = thrown + amp(crinkle_echo_db) * folds + amp(lesser_echo_db) * lesser
    wet = amp(echo_db + curve(COVER))
    shade = 1 / np.sqrt(1 + 1.27 * wet ** 2)  # the tyre blocks part of the straight path
    pack = flattened(shade * straight + echoes(wet * scattered))
    return (pack + ping() + clacks() + car() + wind())[None]


EDGE_HZ = 15900  # upper band limit


def record(dry):
    """Band limiting: a linear-phase low-pass at the recorder's upper edge."""
    lowpass = signal.firwin(255, EDGE_HZ, window=("kaiser", 9), fs=SR)
    return signal.oaconvolve(dry, lowpass[None], "same")


dry = scene()
out = record(dry)
wrap_up_sound(out)
```